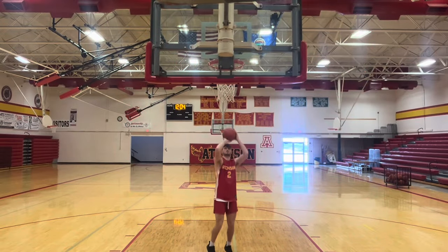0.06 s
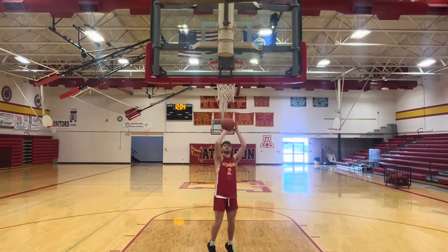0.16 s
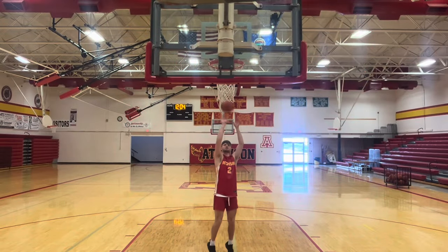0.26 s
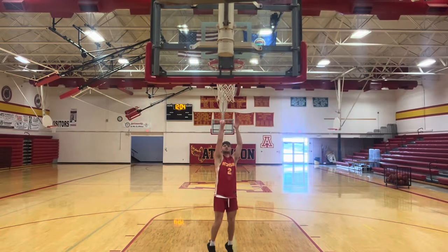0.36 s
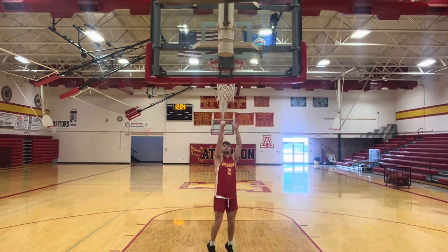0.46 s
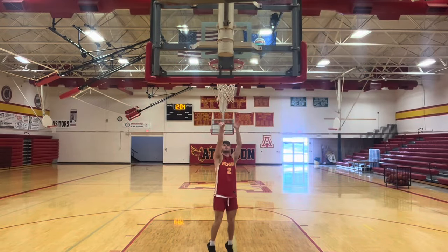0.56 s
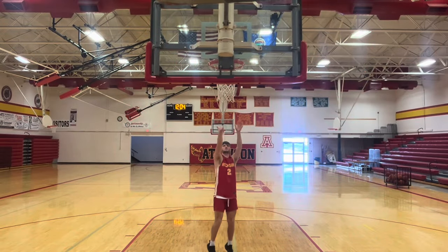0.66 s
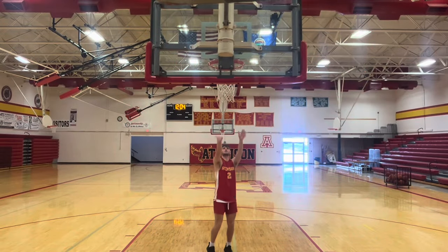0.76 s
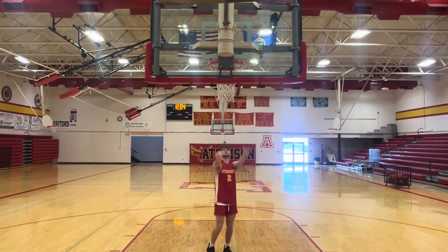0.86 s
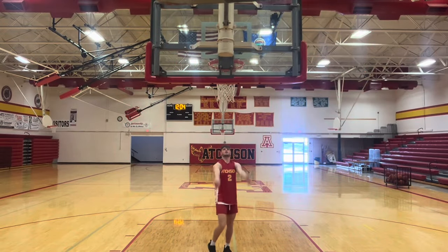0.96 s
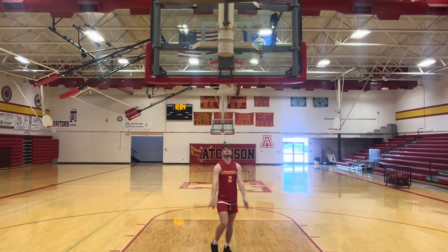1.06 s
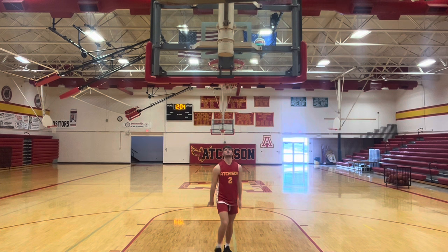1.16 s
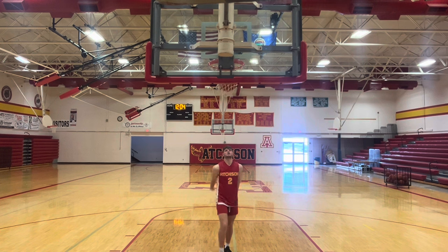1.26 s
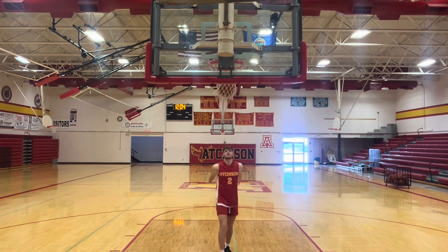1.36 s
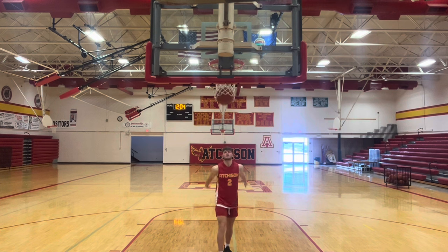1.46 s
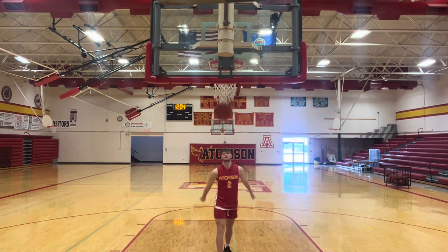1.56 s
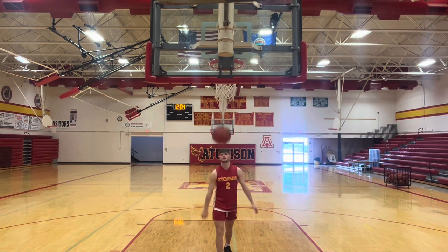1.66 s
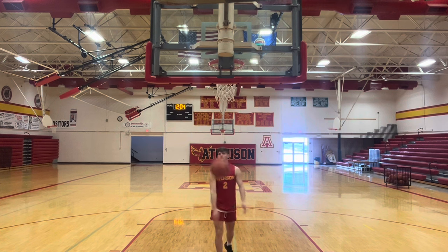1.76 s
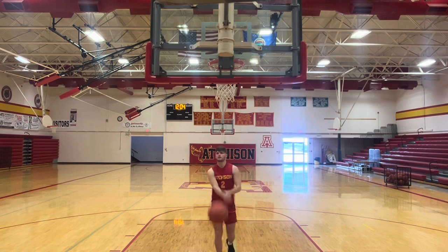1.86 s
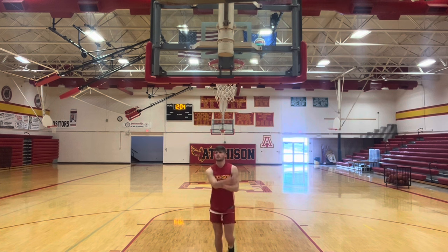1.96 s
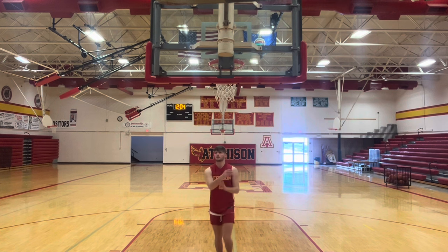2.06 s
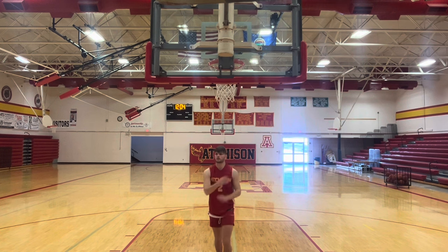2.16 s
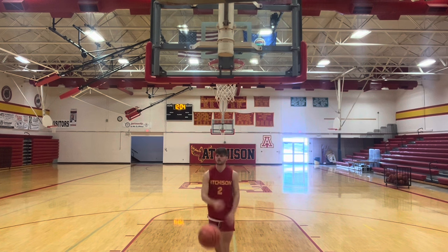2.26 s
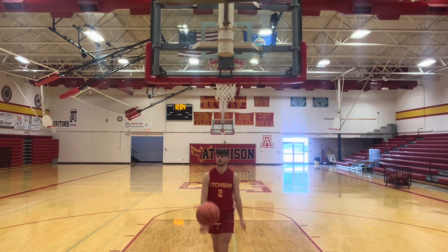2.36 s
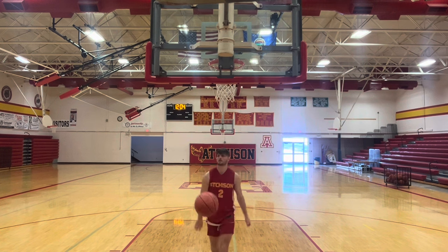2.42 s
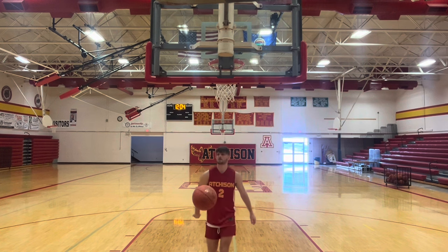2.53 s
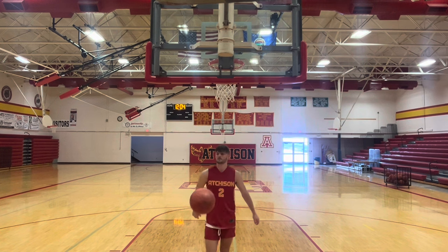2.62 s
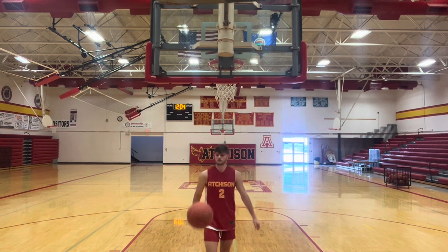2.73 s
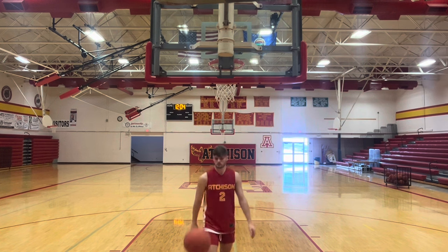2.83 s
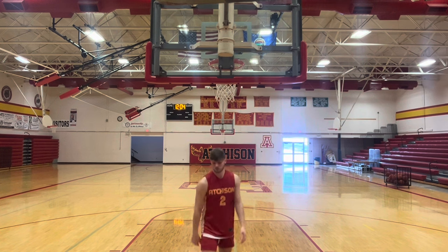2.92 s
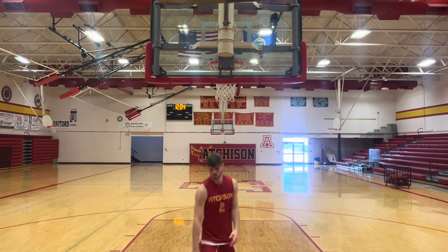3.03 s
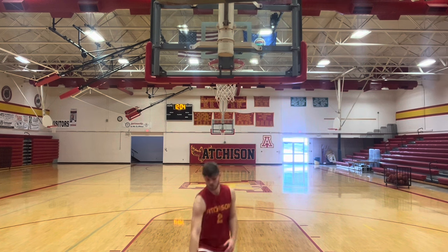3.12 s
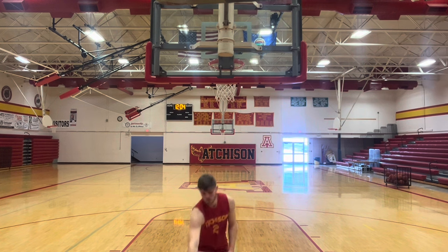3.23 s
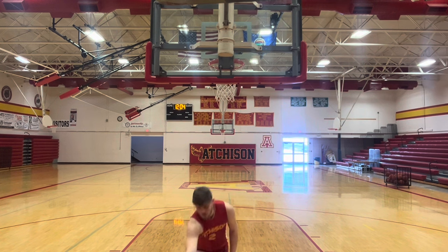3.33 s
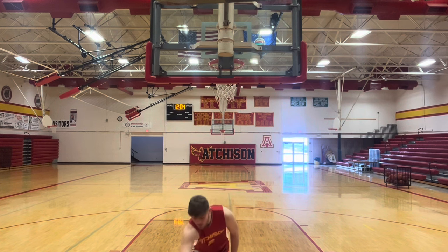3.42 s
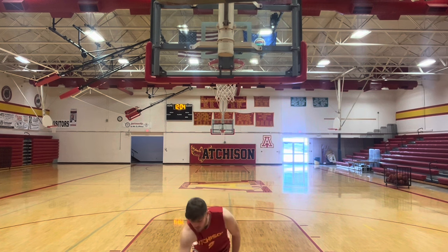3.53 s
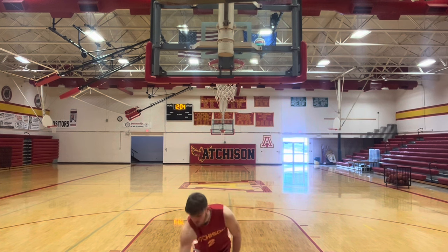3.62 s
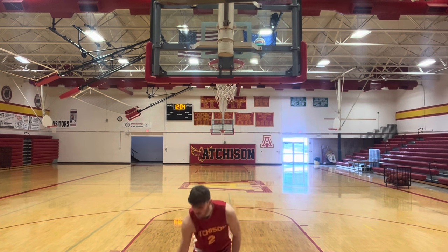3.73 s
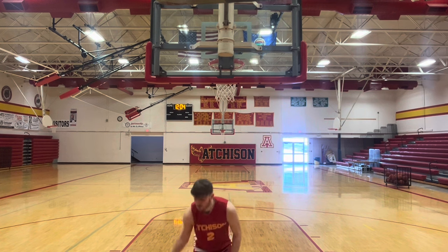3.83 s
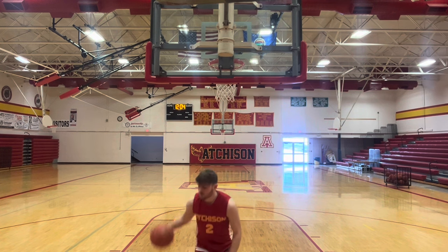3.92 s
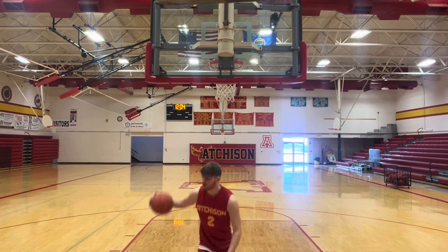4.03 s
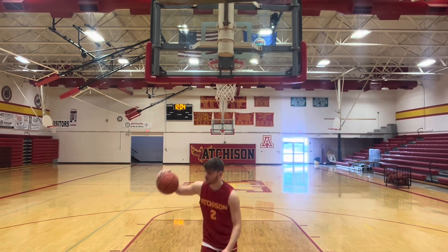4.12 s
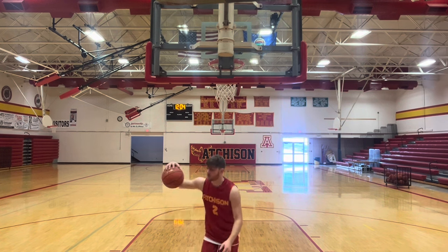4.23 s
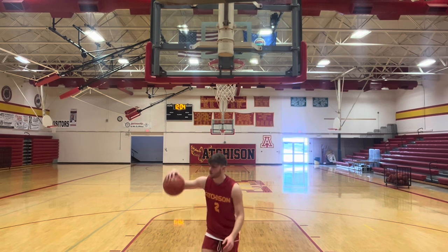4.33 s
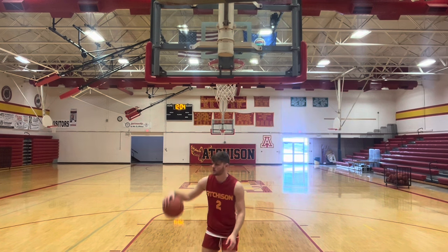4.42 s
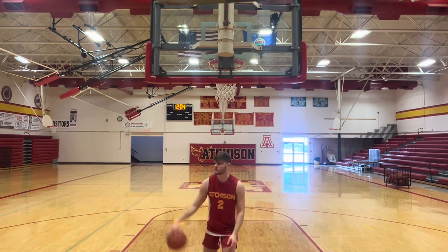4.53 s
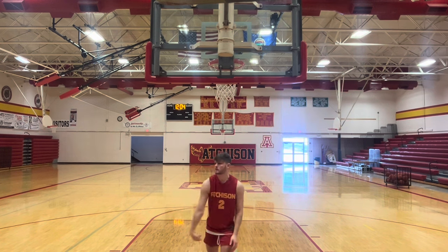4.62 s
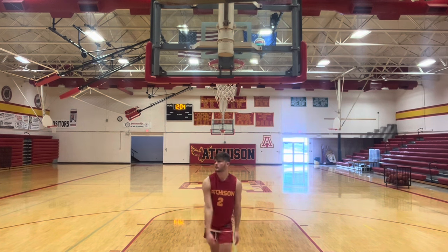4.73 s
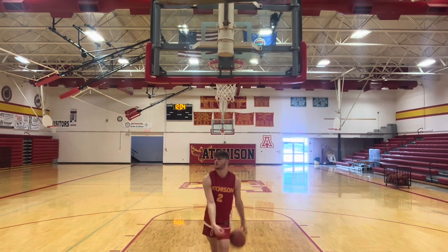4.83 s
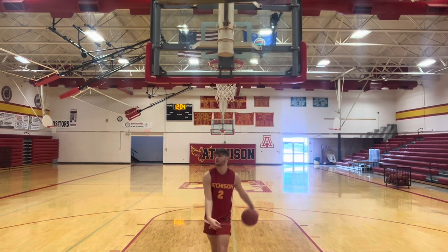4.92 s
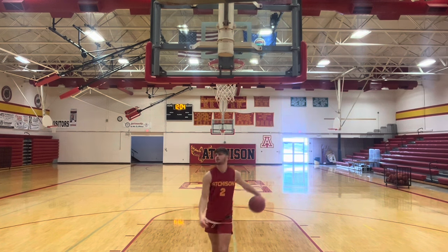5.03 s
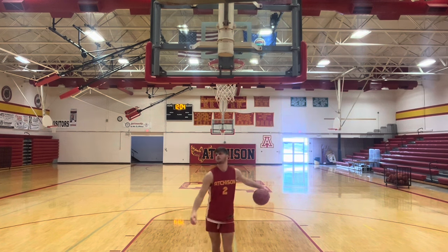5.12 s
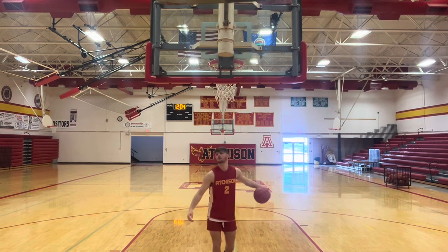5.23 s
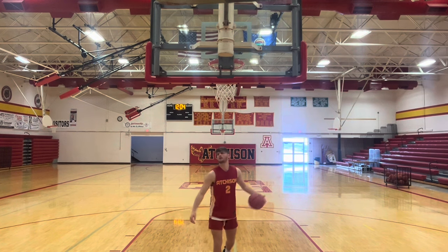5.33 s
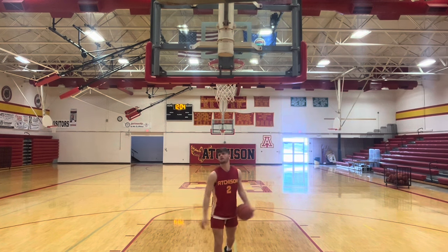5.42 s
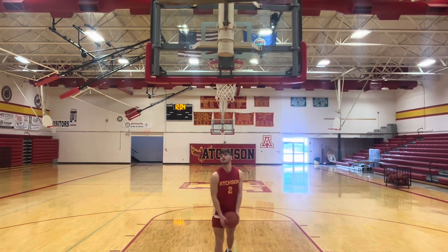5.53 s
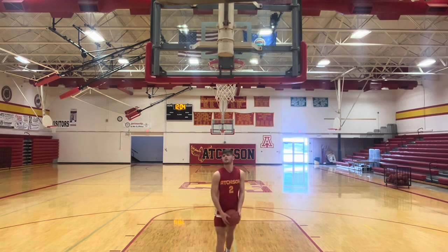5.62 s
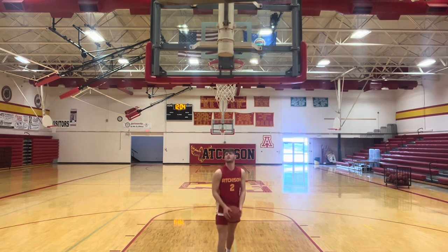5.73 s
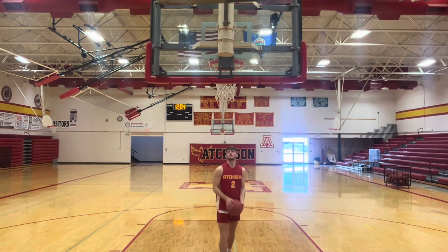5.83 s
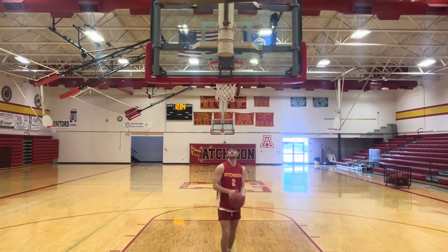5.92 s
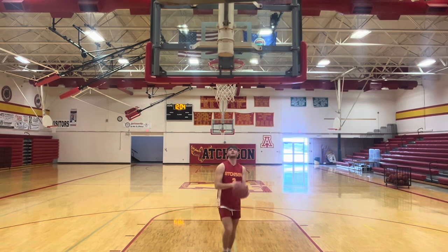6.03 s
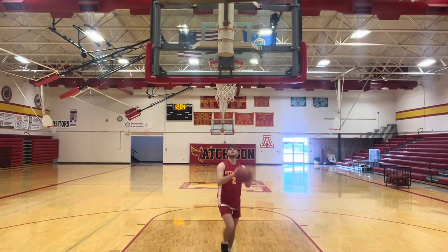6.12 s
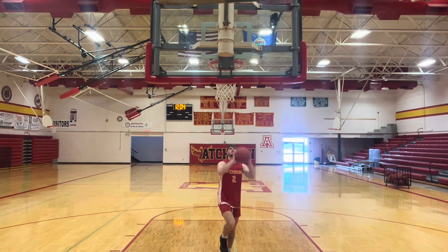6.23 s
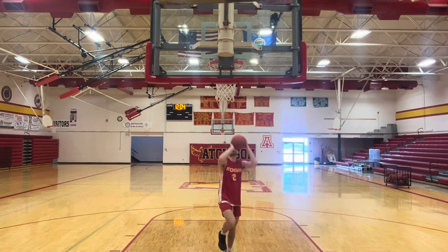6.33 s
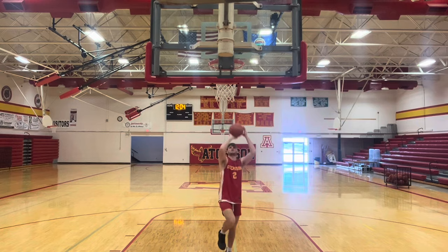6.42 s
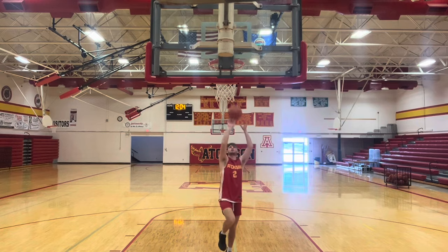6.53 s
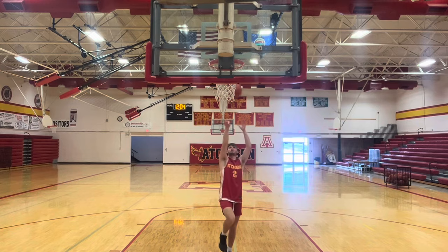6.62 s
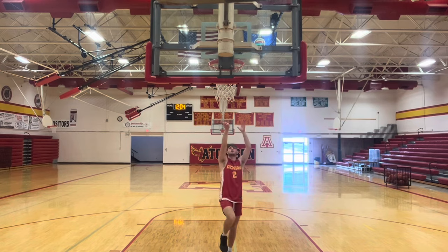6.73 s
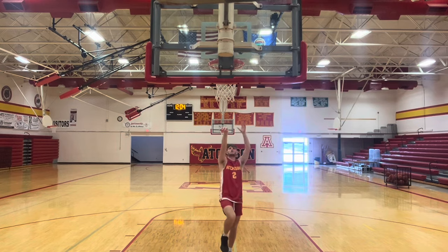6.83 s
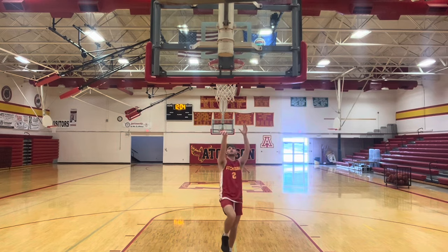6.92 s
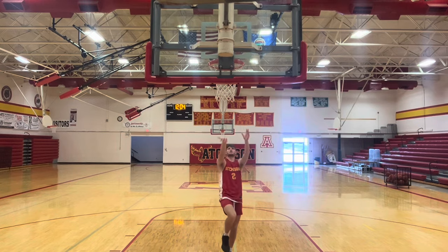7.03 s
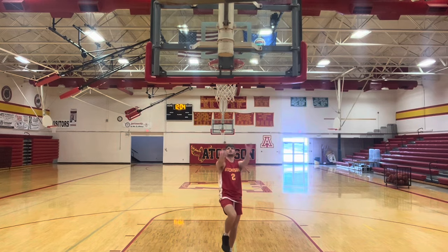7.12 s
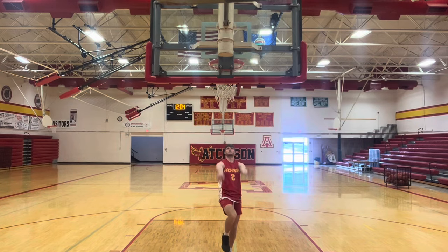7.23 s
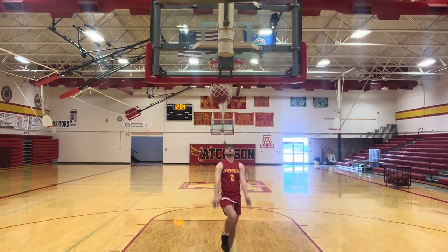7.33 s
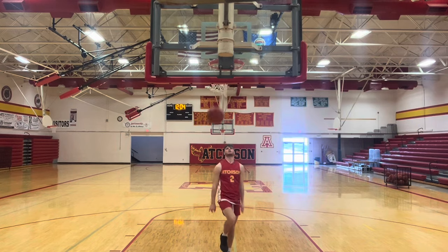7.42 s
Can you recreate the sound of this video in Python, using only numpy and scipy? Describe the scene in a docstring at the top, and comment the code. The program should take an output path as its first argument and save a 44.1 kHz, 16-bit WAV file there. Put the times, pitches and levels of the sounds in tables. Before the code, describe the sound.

In a large empty gym with a low ventilation rumble, a basketball bounces hard on sprung wood close by, with shoe knocks and long echoes.

```python
"""Ventilation rumble (shaped noise) and mains hum (a wavering sine) fill an empty gym throughout.
From 0.9 s shoes knock on the floor: dying puffs of filtered noise, again at 3.1, 5.7 and 7.2 s.
From 2.06 to 5.5 s a basketball bounces close by on the sprung wooden floor and is caught; each blow is
a noisy slap through the air, a chirped bending wave in the boards and a short modal ring of the ball.
From 4.5 s hands, cloth and net rub as swells of hiss; a long noise tail answers every blow and step."""
import sys
import numpy as np
from scipy import signal
from scipy.fft import rfft, irfft
from scipy.io import wavfile
from scipy.ndimage import uniform_filter1d

SR = 44100
rng = np.random.default_rng(int(sys.argv[2]) if len(sys.argv) > 2 else 0)


def wav_out(sig):
    """Save sig, one row per channel (or a flat mono array), as 16-bit PCM at SR to the path in sys.argv[1]."""
    wavfile.write(sys.argv[1], SR, np.round(np.clip(np.atleast_2d(sig).T, -1, 1) * 32767).astype(np.int16))


N = 329559
BLOW_SIZE, LEAD_IN = 8192, 300  # samples in a blow; samples before its contact


def amp(db):
    """Level law: decibels to an amplitude ratio."""
    return 10 ** (np.asarray(db) / 20)


def evened(x):
    """Normalization to unit rms."""
    return x / np.sqrt(np.mean(x ** 2) + 1e-20)


def peaked(x, db):
    """Normalization to a peak level in dB."""
    return amp(db) * x / abs(x).max()


def read(hz, at, value):
    """Linear interpolation on a logarithmic frequency axis."""
    return np.interp(np.log(hz + 1), np.log(np.add(at, 1)), value)


def add(mix, s, sound):
    """Superposition: adds a sound in place from time s, cut at the end of the mix."""
    part = mix[..., round(s * SR):][..., :sound.shape[-1]]
    part += sound[..., :part.shape[-1]]


def coloured(x, at, db):
    """Linear filtering: multiplies the spectrum of the last axis by a level curve."""
    hz = np.fft.rfftfreq(x.shape[-1], 1 / SR)
    return irfft(rfft(x) * amp(read(hz, at, db)), x.shape[-1])


# Ventilation spectrum: f/Hz, relative level/dB
VENTILATION_SPECTRUM = [(20, -56), (35, -25), (50, -2), (72, 2), (105, -5.5), (180, -11.5), (210, -16),
                        (240, -23), (450, -29.5), (900, -37.5), (1300, -47.5), (2900, -47), (3600, -51.5),
                        (4400, -49.5), (5500, -63.5), (9000, -68), (14300, -75), (15700, -100)]
# Mains hum: mean f/Hz, mean rms level/dB
HUM_LINES = [(119.8, -33)]
VENTILATION_RMS_DB = -28


def ventilation():
    """Broadband flow noise with drifting patches, and a hum modulated in frequency and amplitude."""
    frames, hz = N // 512 + 5, np.fft.rfftfreq(2048, 1 / SR)
    real, imaginary, patches = rng.standard_normal((3, 2, 1025, frames))
    # one time-frequency pattern of level, shared by both channels
    patches_db = uniform_filter1d(patches[0], 20, axis=0)
    patches_db = evened(uniform_filter1d(patches_db, 8, axis=1))
    colour_db = read(hz, *np.transpose(VENTILATION_SPECTRUM))[:, None]
    z = (real + 1j * imaginary) * amp(colour_db + patches_db)
    noise = signal.istft(z, nperseg=2048, noverlap=1536)[1][:, :N]
    air = amp(VENTILATION_RMS_DB) * evened(noise)
    slow = uniform_filter1d(rng.standard_normal((2, N)), 6000)
    swell, drift = uniform_filter1d(slow, 6000)
    warped_s = np.cumsum(1 + 0.01115 * evened(drift)) / SR
    swell_db = 1.08 * evened(swell)
    hum = sum(amp(db + swell_db) * np.sqrt(2) * np.sin(2 * np.pi * f * warped_s)
              for f, db in HUM_LINES)
    return air + hum


# Reverberation of the hall: f/Hz, T60/s, colour level/dB
HALL_DECAY = [(61.3, 3.5, 12.5), (93, 4.3, -7), (130, 0.43, -2), (292, 0.72, 4.5), (700, 2.28, -8.5),
              (1470, 1.33, -1.5), (3020, 1.25, -2), (5100, 1.09, -2.1), (8000, 1.13, -4.7),
              (13000, 1.1, -1.5), (14500, .9, -8), (15600, .6, -31.5)]
# Echo clusters from ceiling and side walls: delay t/s, length/s, gain over the tail/dB
WALL_ECHOES = [(0.022, .004, 1.5), (0.042, .012, 1.5), (0.092, .018, 2.5), (0.202, 0.014, 2)]
TAIL_SIZE = 60000  # samples
CLUMP_DB = 2.5  # rms level spread: echoes arrive in clumps of time and pitch


def hall(x, walls):
    """Diffuse reverberation: convolution with two unrelated noise tails, each band decaying at its rate."""
    at, t60, db = np.transpose(HALL_DECAY)
    hz, frame_s, z = signal.stft(rng.standard_normal((2, TAIL_SIZE)), SR, nperseg=512)
    z *= amp(read(hz, at, db)[:, None] - 60 * frame_s / read(hz, at, t60)[:, None])
    clumps = uniform_filter1d(rng.standard_normal(z.shape[1:]), size=7, axis=0)
    clumps = uniform_filter1d(clumps, size=3, axis=1)
    z *= amp(CLUMP_DB * evened(clumps))
    tail = signal.istft(z, SR, nperseg=512)[1][:, :TAIL_SIZE]
    t = np.arange(TAIL_SIZE) / SR
    walls_db = sum(db * np.exp(-((t - s) / length) ** 2) for s, length, db in walls)
    # single echoes stand out of the tail while it is young
    grain = uniform_filter1d(rng.exponential(1, TAIL_SIZE) - 1, 90)
    grain_db = 1.7 * evened(grain) * np.exp(-t / 0.12)
    onset = np.clip((t - .003) / 0.00067, 0, 1)
    tail *= amp(walls_db + grain_db - 32) * onset
    return signal.fftconvolve(x[None], tail, axes=1)


PORT_LAG_S = .000231  # group delay of the right side above the last table row


def ports(pair, at, apart, lead, lean_db):
    """Interchannel coherence: two unrelated signals become left and right with set likeness and phase.

    Above the last row one port feeds both sides, the right one late."""
    size = N + 4096  # mirrored margins keep the ends from wrapping
    hz = np.fft.rfftfreq(size, 1 / SR)
    a, b = rfft(np.pad(pair, ((0, 0), (2048, 2048)), "reflect"))
    above = hz > at[-1]
    apart = np.clip(np.where(above, 0, np.interp(hz, at, apart)), 0, 1)
    lead = np.interp(hz, at, lead) + 2 * np.pi * PORT_LAG_S * np.maximum(hz - at[-1], 0)
    lean = amp(np.where(above, 0, np.interp(hz, at, lean_db)) / 2)
    right = (np.sqrt(1 - apart ** 2) * a + apart * b) * np.exp(-1j * lead)
    return irfft(np.array([a * lean, right / lean]), size)[:, 2048:-2048]


# Two microphone ports in the diffuse field; bass is nearly alike in both:
# f/Hz, unrelated amplitude share/1, phase by which left leads/rad, left minus right level/dB
DIFFUSE_PORTS = [(0, 0, 0, 0), (150, .045, 0, .1), (300, .27, -.1, .5), (450, .3, -.4, .8),
                 (900, .6, -.15, 1.2), (1500, .82, -1.3, -.8), (2100, .76, -.5, 7.3), (2700, .83, -.2, 1.5),
                 (3500, .95, -1.5, -1.1), (4100, .62, -.2, -.6), (5000, .86, -1.1, -3.5),
                 (5300, .95, .3, -3.1), (5700, .25, 2.8, 0)]
# The same ports for direct sound: f/Hz, phase by which left leads/rad, left minus right level/dB
DIRECT_PORTS = [(0, 0, 0), (650, .1, 1.3), (1000, .2, 4), (1350, .2, 1.5), (1650, 2.2, -3), (1950, 3.8, 10),
                (2300, 4.9, 15), (2750, 5.3, 6), (3250, 6.2, -2.5), (3750, 6, 4), (4250, 6.4, 0),
                (4850, 7.7, -4), (5700, 9.1, 0)]


def received(direct, diffuse):
    """Superposition of the coherent direct field and the partly coherent diffuse field at two ports."""
    at, lead, lean_db = np.transpose(DIRECT_PORTS)
    direct_pair = ports(direct, at, np.zeros(len(at)), lead, lean_db)
    return direct_pair + ports(diffuse, *np.transpose(DIFFUSE_PORTS))


# Rubbing of hands, cloth and net: peak t/s, rms level at the peak/dB, centre f/Hz, fall length/s
RUBBINGS = [(4.538, -68.5, 8000, .07), (5.081, -70, 8000, 0.036), (5.438, -75.5, 9600, 0.025),
            (7.202, -51, 700, 0.057), (7.279, -46.5, 800, 0.045), (7.299, -70, 9600, .035)]
RUB_OCTAVES, RUB_RISE = 0.77, 0.81  # distance from centre to -6 dB; rise as a share of the fall


def rubs():
    """Friction noise: band-limited hiss under a lopsided Gaussian swell."""
    out = np.zeros((2, N))
    t, at = np.arange(-11025, 11025) / SR, np.geomspace(100, 20000, 40)
    for s, db, hz, length in RUBBINGS:
        band_db = -6 * (np.log2(at / hz) / RUB_OCTAVES) ** 2
        hiss = coloured(rng.standard_normal((2, len(t))), at, band_db)
        swell = np.exp(-(t / (length * np.where(t < 0, RUB_RISE, 1))) ** 2)
        add(out, s + t[0], amp(db) * evened(hiss) * swell)
    return out


# Colour of a shoe's knock: multiple of its pitch/1, level/dB
SOLE_COLOUR = [(.125, -15.5), (.5, 10.5), (1, 11), (1.6, -1), (4, -16.5), (12, -39.5)]
STEP_T60_S, STEP_RISE_S = 0.16, .0015


def step(db, hz):
    """Damped impact: an exponentially decaying puff of noise filtered around one pitch."""
    t = np.arange(8192) / SR
    decay = amp(db - 60 * t / STEP_T60_S)
    puff = decay * rng.standard_normal(8192) * (1 - np.exp(-t / STEP_RISE_S))
    multiple, colour_db = np.transpose(SOLE_COLOUR)
    fade_out = signal.windows.tukey(16384, .2)[8192:]
    return coloured(puff, hz * multiple, colour_db) * fade_out


# Shoes landing: t/s, level before colouring/dB, pitch f/Hz
SHOE_LANDINGS = [(0.918, -34, 890), (1.008, -43.5, 1090), (3.069, -43.5, 798), (3.084, -49.5, 2580),
                 (5.655, -30.5, 588), (5.700, -35.5, 778), (7.150, -46.5, 1104), (7.270, -35, 597),
                 (7.300, -37.5, 894)]
STEP_HALL_DB = -2


def add_steps(diffuse):
    """Superposition of each knock and its reverberation in the diffuse field."""
    for s, *row in SHOE_LANDINGS:
        sound = step(*row)
        add(diffuse, s, sound)
        add(diffuse, s, amp(STEP_HALL_DB) * hall(sound, WALL_ECHOES))


# Slap of rubber on wood: f/Hz, relative level/dB
SLAP_COLOUR = [(300, -14.5), (700, 3), (1400, -1), (2200, -4), (3000, 4), (3600, -7), (4400, -1),
               (5500, -10.5), (8000, -11.5), (11000, -20.5), (14500, -21.5), (16500, -51)]
TOP_SHARE = 0.58  # share of the treble gain still felt above 7 kHz


def slap(t, hz, hit, slap_db, contact_ms, treble_db):
    """Impulsive radiation with dispersion: the slap of the near side, and its sum over all directions."""
    at, db = np.transpose(SLAP_COLOUR)
    treble_share = np.clip(np.log2(at / 2800) * 2.9, 0, 1) * np.where(at > 7000, TOP_SHARE, 1)
    db = db + treble_db * treble_share
    # a snap, its bounce off a near surface and the crackle of the skin flattening
    snap = 5.4 / contact_ms * (hit + 0.21 * np.roll(hit, 70))
    u = t * 1000 / max(contact_ms, .1)
    skin = snap + rng.standard_normal(BLOW_SIZE) * u * np.exp(1 - u)
    # lower parts arrive later
    lag = np.exp(-2j * np.pi * 1.175 * np.log(np.clip(hz, 300, 2200) / 2200))
    near = peaked(irfft(rfft(coloured(skin, at, db)) * lag), slap_db)
    # summed over all directions the slap has a smooth spectrum
    click = coloured(hit, at, db)
    click *= amp(slap_db) * np.sqrt(contact_ms) / np.linalg.norm(click)
    return near, click


def floor_wave(t, wave_db, stretch):
    """Bending-wave dispersion: low waves are slower and arrive last, so the swell falls in pitch."""
    turns = 1.02 * np.sqrt(t * 1000 / stretch) - .12
    swell = np.exp(-((t / stretch - .0145) / .0085) ** 2)
    wave = amp(wave_db) * np.cos(2 * np.pi * turns) * swell
    return wave * (1 - np.exp(-t / 0.00061))


# Modes of the air and skin of the ball: f/Hz, width before contact damping/Hz, level before tilt/dB
BALL_MODES = [(286, 81, -9), (381.6, 57, -4), (467, 70, 1), (574, 75, -4.5), (653, 35, -1),
              (920, 92, -11.5), (1146, 130, -6), (1412, 290, -7.5), (2170, 110, -10.5)]
RING_TILT_DB = -2.16  # per octave from 250 to 2500 Hz: low modes are favoured
DAMPING_PER_MS = 0.1  # a longer contact widens the modes
RATTLE_T60_S = 0.13  # for a contact of 1 ms; hands that hold on stop it sooner


def ball_ring(t, hz, hit, ring_db, contact_ms):
    """Modal resonance: damped modes of the ball are struck once and then rattled on by noise."""
    widening = 1 + DAMPING_PER_MS * contact_ms
    modes = sum(amp(db) * rng.choice([-1, 1]) / (1 + 2j * (hz - f) / (width * widening))
                for f, width, db in BALL_MODES)
    modes *= amp(RING_TILT_DB * np.log2(np.clip(hz, 250, 2500) / 600))
    rattle = rng.standard_normal(BLOW_SIZE) * amp(-24 - 60 * t * contact_ms / RATTLE_T60_S) * (t > 0)
    strike = np.roll(hit, round(40 + 90 * contact_ms))
    ring = peaked(irfft(rfft(strike + rattle) * modes), ring_db)
    return ring * (1 - np.exp(-t / 0.00061))


def blow(slap_db, wave_db, stretch, ring_db, contact_ms, treble_db):
    """Source directivity: one blow as the near side sends it, and as the whole ball feeds the hall."""
    n, hz = np.arange(BLOW_SIZE) - LEAD_IN, np.fft.rfftfreq(BLOW_SIZE, 1 / SR)
    t, hit = np.maximum(n, 0) / SR, 1. * (n == 0)
    near, click = slap(t, hz, hit, slap_db, contact_ms, treble_db)
    wave = floor_wave(t, wave_db, stretch)
    ring = ball_ring(t, hz, hit, ring_db, contact_ms)
    return near + wave + ring, 3.34 * click + wave + 0.48 * ring


# Blows of the ball: t/s, slap peak level/dB, floor wave level/dB, floor wave time stretch/1,
# ring peak level before its onset/dB, contact/ms, treble gain from about 3 kHz/dB, hall level/dB,
# far wall distance/m
BALL_BLOWS = [(2.0603, -2.5, -3.5, 1.02, -12.5, 0.69, 3, -6, 26.8),
              (3.1114, -19, -31, 1.1, -18.5, 0.5, 0, -2, 39),
              (3.1186, -6, -0.9, 1.02, -18.5, 0.63, -18.5, -14, 18),
              (3.6479, -2, -3, 1.032, -16, 0.4, 2, -7.5, 27.6),
              (4.6676, -2, -3.5, 1.046, -14.5, 0.47, 0.5, -8.5, 30.9),
              (5.5040, -6.5, -14, 0.875, -5.5, 1.7, 9.5, -9.5, 28)]
SOUND_M_PER_S = 343
ECHO_S, ECHO_DB = .003, 7  # length and strength of the far wall's answer


def add_blows(direct, diffuse):
    """Image-source delay: each blow arrives directly, then from the hall with an echo off the far wall."""
    for s, *row, hall_db, wall_m in BALL_BLOWS:
        near, around = blow(*row)
        start_s = s - LEAD_IN / SR
        add(direct, start_s, near)
        far_wall = (2 * wall_m / SOUND_M_PER_S, ECHO_S, ECHO_DB)
        add(diffuse, start_s, amp(hall_db) * hall(around, WALL_ECHOES + [far_wall]))


def scene():
    """Field separation: direct and diffuse sound are gathered apart and reach the ports differently."""
    direct, diffuse = np.zeros((2, N)), ventilation() + rubs()
    add_blows(direct, diffuse)
    add_steps(diffuse)
    return received(direct, diffuse)


EDGE_HZ = 16400


def record(dry):
    """Band limitation: a linear-phase low-pass."""
    edge = signal.firwin(1023, EDGE_HZ, window=("kaiser", 12), fs=SR)
    return signal.oaconvolve(dry, edge[None], "same")


dry = scene()
out = record(dry)
wav_out(out)
```